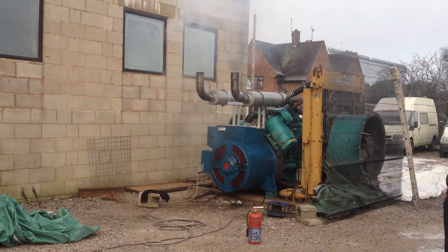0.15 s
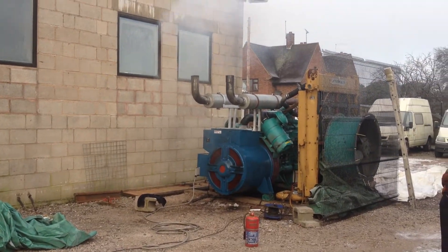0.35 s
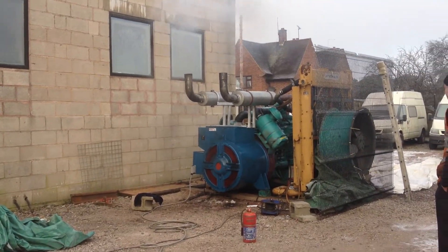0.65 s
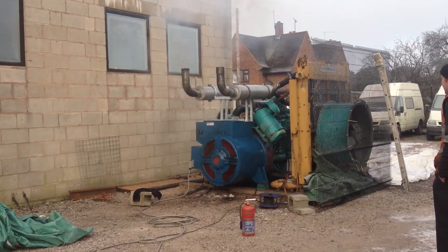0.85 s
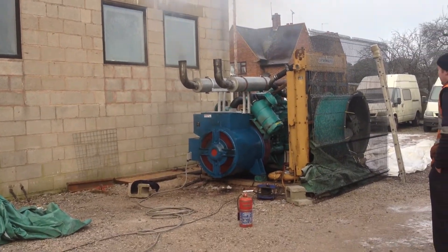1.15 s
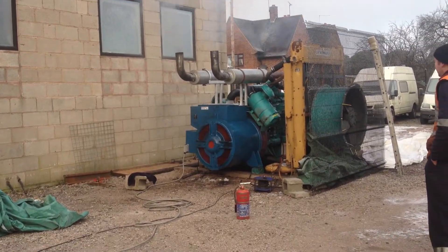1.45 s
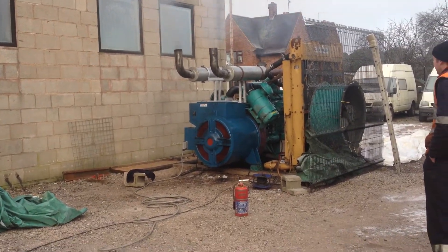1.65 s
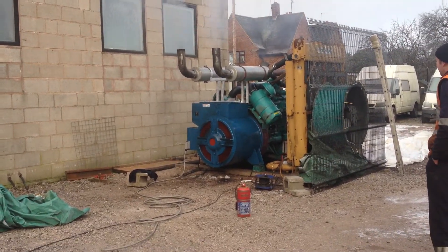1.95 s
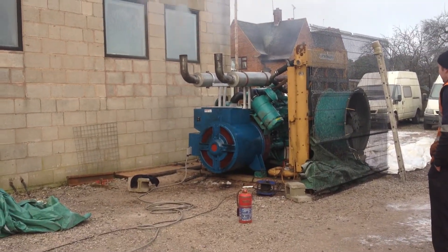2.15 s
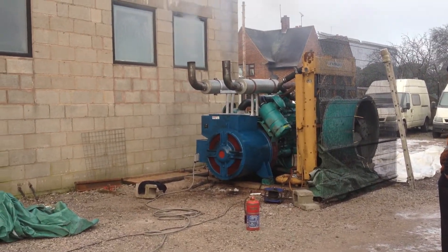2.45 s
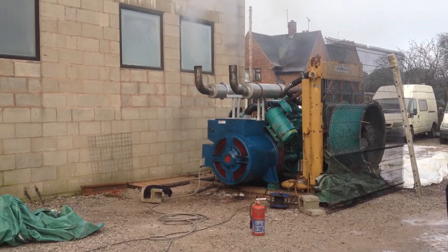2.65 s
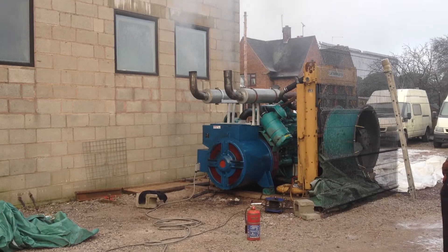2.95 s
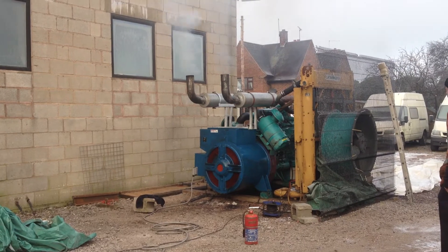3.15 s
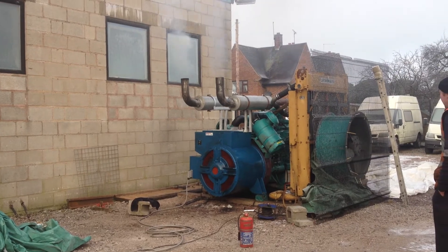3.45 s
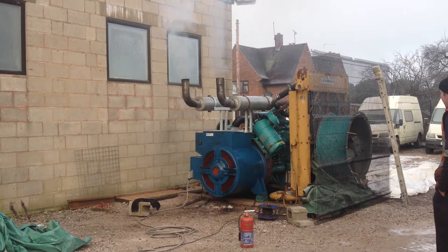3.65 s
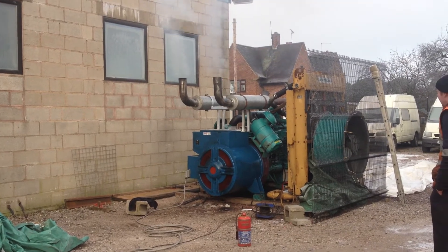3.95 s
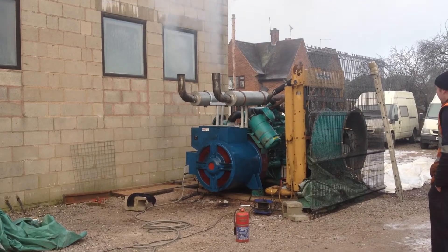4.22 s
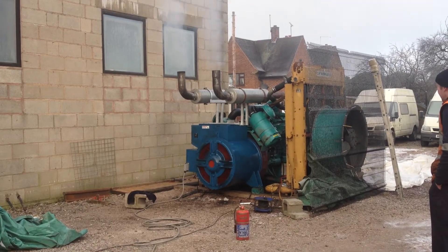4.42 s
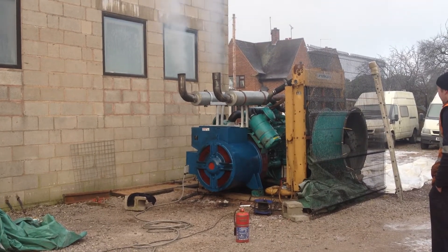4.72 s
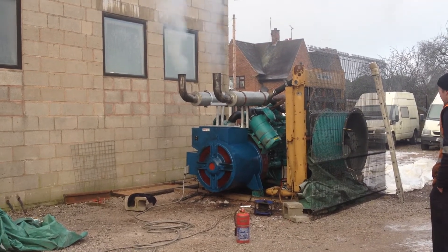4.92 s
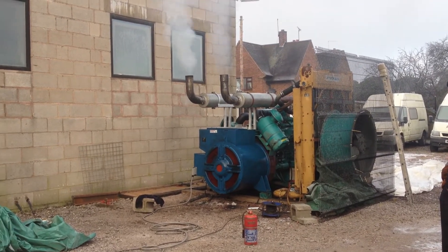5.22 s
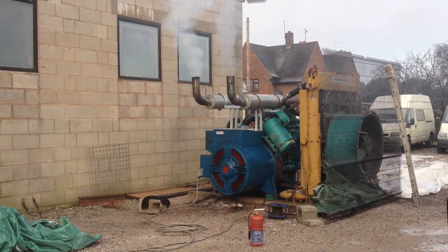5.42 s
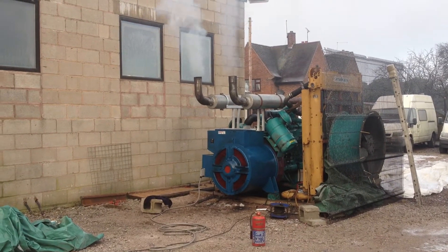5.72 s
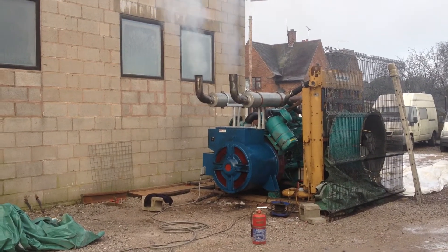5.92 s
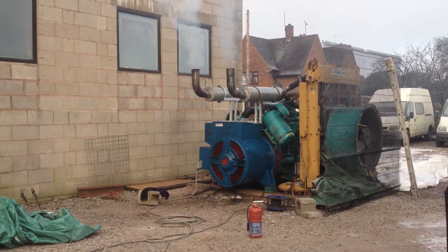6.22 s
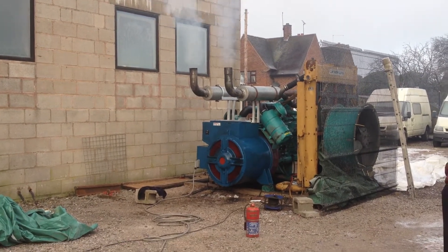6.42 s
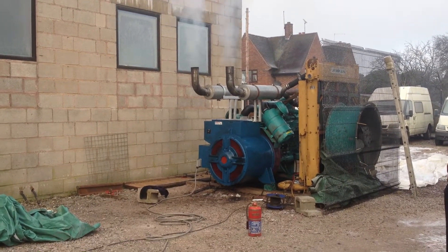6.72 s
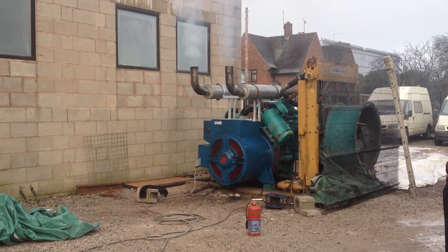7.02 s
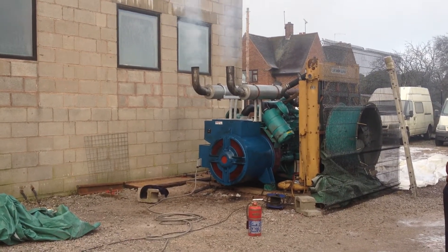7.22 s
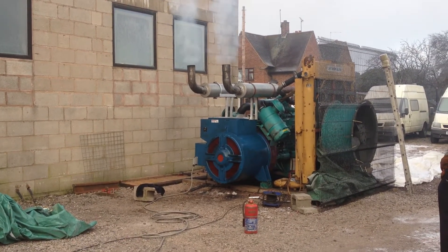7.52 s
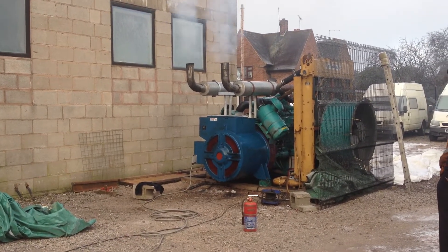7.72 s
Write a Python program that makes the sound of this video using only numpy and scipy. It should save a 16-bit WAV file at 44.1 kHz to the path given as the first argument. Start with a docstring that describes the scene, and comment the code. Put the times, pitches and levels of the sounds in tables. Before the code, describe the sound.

A large multi-cylinder diesel generator is already running in an open yard. Bright steel gear rattle comes in rapid uneven bursts, about fifteen to twenty a second, with a rough whine. Beneath are dense block knocking, fan noise and a softer exhaust throb. The idle climbs slowly, holds, sags, then recovers. A small microphone gives thin bass and dull top treble.

```python
"""In a yard, a big twelve-cylinder diesel generator idles cold, its speed slowly hunting up and down.
Gear teeth strike at the tooth rate and ring steel, big wheel and casing; shaft swings gate them into bursts.
The teeth also whine, flaring wherever a multiple of the tooth rate crosses a resonance of the cover.
Under it each firing shakes the block and puffs into the exhaust stacks, whose tones throb and boom in the pipes."""
import sys
import numpy as np
from scipy import signal
from scipy.fft import rfft, irfft
from scipy.io import wavfile
from scipy.ndimage import uniform_filter1d

SR = 44100
rng = np.random.default_rng(int(sys.argv[2]) if len(sys.argv) > 2 else 0)


def wav_out(sig):
    """Save sig, one row per channel (or a flat mono array), as 16-bit PCM at SR to the path in sys.argv[1]."""
    wavfile.write(sys.argv[1], SR, np.round(np.clip(np.atleast_2d(sig).T, -1, 1) * 32767).astype(np.int16))


N = 347067
TIME = np.arange(N) / SR  # s

CYLINDERS, GEAR_TEETH = 12, 66
IDLE_RPM = 780  # centre of the hunting
RATTLE_DB = -32  # loose rattle between bursts


def undb(db):
    """Decibels to gain."""
    return 10 ** (np.asarray(db) / 20)


def unit(x):
    """Scale to rms 1."""
    return x / np.sqrt(np.mean(x ** 2))


def curve(table):
    """Join (s, value) rows by straight lines in time."""
    s, value = np.transpose(table)
    return np.interp(TIME, s, value)


def walk(rate_hz):
    """Random wander with spread near 1: straight lines between rate_hz fresh values a second."""
    values = rng.standard_normal(N // 8)
    return 1.2 * np.interp(TIME * rate_hz, np.arange(N // 8), values)


def ring(x, spectrum, size=8192):
    """Pass x through a minimum-phase body with the given (Hz, dB) response."""
    hz, db = np.transpose(spectrum)
    grid_hz = np.maximum(np.arange(size // 2 + 1) * SR / size, 1)
    response_db = np.interp(np.log(grid_hz), np.log(hz), db)
    # folding the cepstrum makes the response causal
    cepstrum = irfft(np.log(undb(response_db)))
    cepstrum[1:size // 2] *= 2
    cepstrum[size // 2 + 1:] = 0
    impulse = irfft(np.exp(rfft(cepstrum)))
    return signal.fftconvolve(x, impulse)[:N]


def smear(x, t60_s, tail_db):
    """Give every impact a short hissing tail: many small metal parts ringing."""
    decay = np.exp(-2 * np.log(1000) / (t60_s * SR))
    energy = signal.lfilter([1], [1, -decay], x ** 2)
    hiss = np.sqrt(energy) * rng.standard_normal(N)
    return unit(x) + undb(tail_db) * unit(hiss)


def wraps(phase):
    """Samples at which a phase, counted in cycles, begins a new cycle."""
    return np.flatnonzero(np.diff(np.floor(phase)) > 0)


def clicks(at, sizes):
    """Single impacts at the given samples."""
    return np.bincount(np.clip(at, 0, N - 1).astype(int), sizes, N)


def tone(phase):
    """Unsteady sine on a phase counted in cycles, wandering in level and phase."""
    level = np.sqrt(2) * undb(3.2 * walk(14))
    return level * np.sin(2 * np.pi * (phase + .09 * walk(16)))


def slowness(turns):
    """Turns per second by which the shaft lags behind its mean idle speed."""
    return IDLE_RPM / 60 - turns


def swell(force, late_s, share):
    """Gain near 1 that follows the slams late_s after them; negative late_s leads."""
    shifted = np.interp(TIME - late_s, TIME, force / force.mean())
    return np.maximum(1 + share * (shifted - 1), 0)


def firings(crank, uneven_db, scatter_db, late_s=.0007):
    """One impact per firing, six a turn; strength differs by cylinder and by firing, timing jitters."""
    at = wraps(crank * CYLINDERS / 2)
    cylinder_db = uneven_db * rng.standard_normal(CYLINDERS)
    size, late = rng.standard_normal((N // 100, 2))[:len(at)].T
    level_db = cylinder_db[np.arange(len(at)) % CYLINDERS] + scatter_db * size
    return clicks(at + late_s * SR * late, undb(level_db))


def exhaust(crank, gas_db=3):
    """Cold cylinders puff unevenly into the stacks, with a rush of turbulent gas."""
    # Stack response. Each row: frequency in Hz, relative level in dB.
    stack_response = [(25, -32), (55, -35), (82, -13), (105, -11.5), (122, -4.5), (148, -8), (175, 1.5),
                      (215, 0.5), (240, 0), (265, -0.5), (305, -8.5), (420, -14.5), (900, -46.5)]
    puffs = np.diff(firings(crank, uneven_db=2.0, scatter_db=3.5), prepend=0)
    gas = rng.standard_normal(N)
    return unit(unit(ring(puffs, stack_response)) + undb(gas_db) * unit(ring(gas, stack_response)))


def throb(crank):
    """Multiples of the shaft rate swell as they glide through the standing waves of the pipes."""
    # Strongest exhaust tones. Each row: multiple of the crankshaft rate, relative level in dB.
    orders = [(6, -0.5), (9.5, -6), (10, -9), (14.5, -9), (17, -10.5), (18, 4), (19, -6), (20, 0.5),
              (22.5, -1.5), (24, -1.5)]
    # Standing waves in the exhaust pipes. Each row: frequency in Hz, relative level in dB.
    pipe_response = [(72, -20.5), (88, -4), (108, -22), (119, 5.5), (128, -15), (146, -11), (161, 5.5),
                     (178, 1), (208, 3), (226, -1), (241, 2.5), (262, 4.5), (286, 0.5), (315, -15)]
    tones = sum(undb(db) * tone(multiple * crank) for multiple, db in orders)
    return unit(ring(tones, pipe_response))


def boom(crank):
    """Now and then one exhaust tone swells on a standing wave of the pipes, holds, and dies away."""
    # Each row: middle in seconds, length in seconds, multiple of the crankshaft rate, level in dB.
    booms = [(1.024, .35, 10, -47), (1.5, 0.27, 10, -48.5), (2.148, 0.88, 12, -45)]
    out = 0
    for middle_s, length_s, multiple, db in booms:
        envelope = np.exp(-(2 * (TIME - middle_s) / length_s) ** 4)
        out = out + undb(db) * envelope * tone(multiple * crank)
    return out


def knock(crank, fan_db=-4, lope_db=0.5):
    """Firings shake the block with short crashes, harder on one side of the cycle; fan noise fills the gaps."""
    # Engine block response. Each row: frequency in Hz, relative level in dB.
    block_response = [(200, -30.5), (430, -20.5), (540, -10), (620, -0.5), (673, 5), (705, -2), (760, 0.5),
                      (920, -12), (1080, 0), (1400, -8.5), (1700, -9), (2400, -12), (3500, -14.5),
                      (15000, -38)]
    lope = undb(lope_db * np.sin(np.pi * crank))  # one cycle is two turns
    impacts = lope * firings(crank, uneven_db=2.1, scatter_db=3.0)
    crashes = smear(impacts, t60_s=0.11, tail_db=9.5)
    fan = undb(fan_db) * rng.standard_normal(N)
    return unit(ring(unit(crashes) + fan, block_response))


def backlash(turns):
    """Force on teeth, casing and wheel: each shaft swing slams gears across their play, sags, and lets go."""
    # Slams, one for each swing of the shaft. Each row: start in seconds, force in dB, hold in seconds.
    bursts = [(0, -22.0, 0.023), (0.026, -21, 0.022), (0.061, -23, 0.048), (0.129, -21.0, 0.018),
              (0.19, -21.5, 0.029), (0.244, -23.0, 0.034), (0.27, -24.5, 0.05), (0.323, -22.0, 0.039),
              (0.353, -24.5, 0.028), (0.395, -21.5, 0.033), (0.445, -22.0, 0.048), (0.49, -24.5, 0.029),
              (0.53, -22, 0.029), (0.599, -22, 0.028), (0.647, -23.0, 0.044), (0.719, -21.0, 0.032),
              (0.782, -21, 0.028), (0.851, -20.5, 0.025), (0.914, -20.5, 0.03), (0.968, -21.5, 0.029),
              (1.038, -20.5, 0.028), (1.104, -22, 0.033), (1.147, -19.5, 0.027), (1.209, -23, 0.025),
              (1.273, -23, 0.034), (1.327, -20.5, 0.031), (1.447, -21.5, 0.033), (1.501, -21.5, 0.034),
              (1.609, -21, 0.032), (1.663, -21, 0.035), (1.746, -23.0, 0.027), (1.792, -23.5, 0.034),
              (1.835, -20.0, 0.035), (1.947, -21.5, 0.034), (1.996, -21.5, 0.034), (2.079, -26.0, 0.026),
              (2.107, -23.5, 0.037), (2.157, -21.0, 0.032), (2.258, -21.5, 0.03), (2.314, -20, 0.027),
              (2.423, -19.0, 0.027), (2.476, -21.5, 0.032), (2.582, -20, 0.024), (2.632, -21.5, 0.035),
              (2.731, -23.0, 0.037), (2.787, -25.5, 0.021), (2.872, -22.5, 0.033), (2.922, -22.5, 0.025),
              (2.978, -21, 0.016), (3.029, -22.5, 0.026), (3.07, -22, 0.027), (3.151, -24.5, 0.042),
              (3.215, -21.5, 0.029), (3.274, -25.5, 0.031), (3.318, -21.5, 0.031), (3.372, -25, 0.029),
              (3.51, -21.5, 0.029), (3.601, -20.0, 0.026), (3.736, -24, 0.038), (3.797, -22.5, 0.028),
              (3.864, -24.0, 0.04), (3.884, -25.0, 0.043), (3.936, -22, 0.033), (4.043, -22.5, 0.03),
              (4.084, -23, 0.035), (4.174, -23.5, 0.035), (4.231, -20.5, 0.033), (4.324, -21, 0.03),
              (4.384, -23.0, 0.03), (4.443, -25.0, 0.042), (4.482, -27.5, 0.029), (4.539, -22.5, 0.025),
              (4.571, -24.0, 0.026), (4.622, -26.5, 0.036), (4.718, -22.0, 0.023), (4.771, -23.5, 0.041),
              (4.855, -21.5, 0.038), (4.914, -23, 0.035), (4.951, -26, 0.036), (4.966, -23, 0.05),
              (5.025, -22.5, 0.022), (5.067, -20, 0.028), (5.131, -23, 0.031), (5.166, -23.5, 0.029),
              (5.224, -23.5, 0.03), (5.265, -20, 0.034), (5.328, -23.0, 0.02), (5.377, -20.5, 0.024),
              (5.424, -21, 0.027), (5.477, -21.5, 0.023), (5.523, -20, 0.038), (5.583, -22.0, 0.028),
              (5.628, -18.5, 0.023), (5.681, -20, 0.038), (5.732, -20, 0.025), (5.783, -21.0, 0.037),
              (5.834, -20.0, 0.037), (5.892, -19.0, 0.03), (5.955, -20, 0.029), (6.008, -21, 0.036),
              (6.064, -20.5, 0.033), (6.118, -20.0, 0.029), (6.169, -20.0, 0.025), (6.215, -23.5, 0.035),
              (6.24, -21, 0.03), (6.297, -20.5, 0.025), (6.348, -21, 0.03), (6.383, -25, 0.026),
              (6.418, -19.5, 0.024), (6.471, -22.5, 0.052), (6.524, -26, 0.024), (6.533, -21, 0.029),
              (6.58, -25.5, 0.025), (6.605, -22, 0.025), (6.653, -21, 0.05), (6.717, -21.5, 0.049),
              (6.788, -22, 0.031), (6.829, -23.0, 0.033), (6.854, -20.5, 0.02), (6.9, -21, 0.04),
              (6.94, -22.5, 0.024), (6.984, -21.5, 0.028), (7.036, -22.5, 0.05), (7.1, -22, 0.047),
              (7.172, -21.5, 0.027), (7.227, -22.5, 0.038), (7.262, -29, 0.025), (7.291, -22.5, 0.04),
              (7.37, -22, 0.038), (7.442, -21.0, 0.018), (7.48, -20.5, 0.04), (7.654, -23.5, 0.039),
              (7.73, -32, 0.056), (7.812, -31.5, 0.042)]
    # Big wheel's singing. Each row: time in seconds, force on the wheel against that on the teeth in dB.
    singing = [(0, 1.5), (1.05, 4.5), (1.5, 1), (2.5, 4), (2.9, 0), (4.9, -2), (6, 0), (6.35, 4),
               (7.1, -0.5), (7.87, 2)]
    singing_per_slam = 0.53  # dB per dB of slam above the mean
    rise_s, sag_s, release_s = 0.0097, 0.091, 0.024  # sag and release are time constants
    # a slower shaft shakes the casing harder
    weight_db, weight_slow_db = 0.33, .5  # at idle speed; per turn/s slower
    power = np.zeros((3, N))
    usual_db = np.mean([db for _, db, _ in bursts])
    for start_s, db, hold_s in bursts:
        first = int(start_s * SR)
        span = slice(first, first + SR // 5)
        age_s = np.maximum(TIME[span] - start_s, 0)
        rise = np.minimum(age_s / rise_s, 1)
        sag = (hold_s / 2 - age_s) / sag_s
        release = np.maximum(age_s - hold_s, 0) / release_s
        force = undb(db) * rise * np.exp(sag - release)
        casing_db = weight_db + weight_slow_db * slowness(turns[first])
        wheel_db = np.interp(start_s, *np.transpose(singing)) + singing_per_slam * (db - usual_db)
        power[:, span] += np.outer(undb([0, casing_db, wheel_db]), force) ** 2
    return np.sqrt(power)


def whine(turns, force, swing=0.01118, settle_s=0.024, flutter=.019):
    """Cam gears of both banks whine at multiples of the tooth rate; slams lift the pitch, which then sags."""
    # Each row: multiple of the tooth rate, relative level in dB.
    harmonics = [(2, -5), (3, 2), (4, -1.5), (5, -5)]
    pole = np.exp(-1 / (settle_s * SR))
    jolt = unit(signal.lfilter([1, -1], [1, -pole], force))
    out = 0
    for bank in range(2):
        tooth_hz = GEAR_TEETH * turns * (1 + swing * jolt + flutter * walk(170))
        mesh = np.cumsum(tooth_hz) / SR
        for multiple, db in harmonics:
            phase = multiple * mesh + 0.11 * walk(260)
            out = out + undb(db) * np.sin(2 * np.pi * phase)
    return unit(out)


def brighten(x, turns, edge_hz=9500, fast_db=.6):
    """Faster teeth tick more brightly: scale the top treble by fast_db per turn/s above idle."""
    highpass = signal.butter(2, edge_hz, "highpass", fs=SR, output="sos")
    top = signal.sosfiltfilt(highpass, x)
    return x + (undb(-fast_db * slowness(turns)) - 1) * top


def tooth_strikes(turns, late_s=.0007, flutter=.02):
    """Each tooth hits one flank, a little early or late and unevenly, then rebounds against the other."""
    mesh = np.cumsum(GEAR_TEETH * turns * (1 + flutter * walk(170))) / SR
    at = wraps(mesh)
    late, size, rebound, rebound_size = rng.standard_normal((N // 20, 4))[:len(at)].T
    hits = clicks(at + late * late_s * SR, undb(3 * np.minimum(size, 2)))
    rebounds = clicks(at + abs(rebound) * 2 * late_s * SR, undb(3 * np.minimum(rebound_size, 2)))
    return hits - rebounds


def gears(turns, forces, steel_db=-0.62, wheel_db=-6.0, casing_db=-4.5, whine_db=-0.66, idle_whine_db=-7.5):
    """Tooth strikes ring the steel, the big wheel and the casing; the whine rings the cover."""
    # Steel gears, big wheel's close modes, gear casing. Each row: frequency in Hz, relative level in dB.
    steel_response = [(2800, -31.5), (3300, -12), (3750, -13), (4100, -14), (4500, -7), (4780, -1.5),
                      (5080, -5), (5400, -2), (5600, -1), (6100, -2.5), (6750, -8.5), (7100, -7),
                      (7500, -13.5), (15000, -17.5)]
    wheel_response = [(4500, -44.5), (5800, -6), (6200, 5), (6330, -1), (6450, 2.5), (6800, -12.5),
                      (8000, -33.5)]
    casing_response = [(450, -25), (700, -6.5), (900, -7), (1100, -5), (1400, 1), (1520, -1.5), (1700, -7),
                       (1930, -4.5), (2100, 0), (2330, 4), (2620, 2.5), (2900, -7.5), (3500, -8.5),
                       (5000, -25)]
    # Gear shafts and cover. Each row: frequency in Hz, gain in dB.
    cover_response = [(1200, -11.5), (1400, 0.5), (1520, 0.5), (1620, -6), (1850, 0.5), (2030, -3),
                      (2170, -1.5), (2330, 2), (2600, -0.5), (2800, -12.5), (3200, -9), (4350, -19.5),
                      (4760, 3), (5100, -12.5)]
    on_teeth, on_casing, on_wheel = np.hypot(forces, undb(RATTLE_DB))
    strikes = tooth_strikes(turns)
    steel = unit(ring(smear(strikes, t60_s=.05, tail_db=1), steel_response))
    steel = brighten(steel, turns) * on_teeth
    wheel = unit(ring(smear(strikes, t60_s=.04, tail_db=3), wheel_response)) * on_wheel
    casing = unit(ring(smear(strikes, t60_s=.04, tail_db=-7), casing_response)) * on_casing
    # loaded teeth whine far more than loose ones
    load = np.hypot(forces[1], undb(RATTLE_DB + idle_whine_db))
    cover = ring(whine(turns, forces[0]) * load, cover_response)
    struck = undb(steel_db) * steel + undb(wheel_db) * wheel + undb(casing_db) * casing
    return struck + undb(whine_db) * cover


def scene(inertia_s=0.57):
    """One crankshaft drives exhaust, block and gears."""
    # Crankshaft speed. Each row: time in seconds, turns per minute.
    speed = [(0, 644), (.5, 650), (.9, 700), (1.3, 700), (1.55, 730), (1.8, 783), (2.3, 797), (2.8, 836),
             (3.4, 886), (3.9, 870), (4.4, 863), (4.9, 872), (5.4, 852), (5.7, 800), (6.1, 744), (6.6, 679),
             (7.15, 666), (7.87, 800)]
    # Engine effort. Each row: time in seconds, level of the exhaust tones in dB.
    effort = [(0, -38.5), (1.25, -36.5), (1.8, -44), (3.5, -45), (4.7, -42), (6, -46.5), (6.8, -45.5),
              (7.87, -42)]
    rush_db, knock_db = -40.5, -32.5  # knock at steady speed
    knock_pull_db = 0.3  # per turn/s gained in a second: knocks harder pulling up to speed
    exhaust_lead_s, exhaust_share = .006, .1  # exhaust swells just before a slam
    block_lag_s, block_share = 0.021, 0.13  # block shakes harder just after
    turns = curve(speed) / 60  # per second
    crank = np.cumsum(turns) / SR
    pull = uniform_filter1d(np.gradient(turns) * SR, int(inertia_s * SR))
    forces = backlash(turns)
    stacks = undb(rush_db) * exhaust(crank) + undb(curve(effort)) * throb(crank) + boom(crank)
    stacks = stacks * swell(forces[0], -exhaust_lead_s, exhaust_share)
    block = undb(knock_db + knock_pull_db * pull) * knock(crank)
    block = block * swell(forces[0], block_lag_s, block_share)
    return (stacks + block + gears(turns, forces))[None]


def record(dry, bass_cut_hz=70, top_hz=15550):
    """A small microphone with thin bass and a dull top rounds the tallest peaks; a steep cut-off ends it."""
    # Microphone treble. Each row: frequency in Hz, gain in dB.
    treble_response = [(7500, 0.5), (8500, -1.5), (9200, -10), (9800, -20.5), (10800, -21.5),
                       (12000, -15.5), (15000, -16)]
    bass_cut = signal.butter(3, bass_cut_hz, "highpass", fs=SR, output="sos")
    heard = signal.sosfilt(bass_cut, ring(dry[0], treble_response))
    rounded = np.tanh(heard / 2) * 2
    top_cut = signal.ellip(10, .2, 80, top_hz, fs=SR, output="sos")
    return signal.sosfilt(top_cut, rounded)[None]


dry = scene()
out = record(dry)
wav_out(out)
```